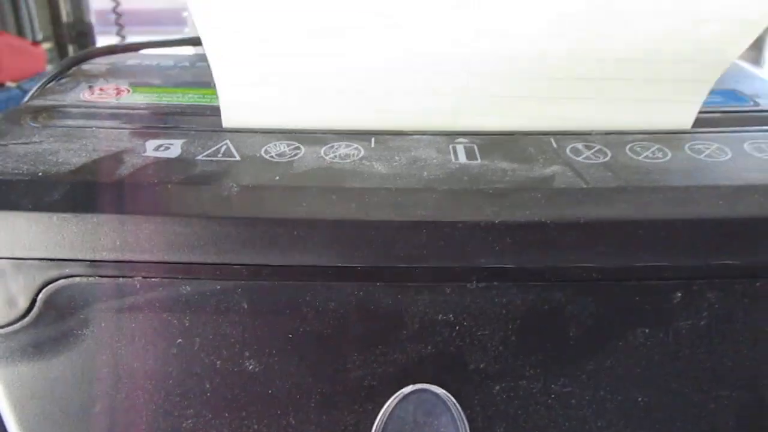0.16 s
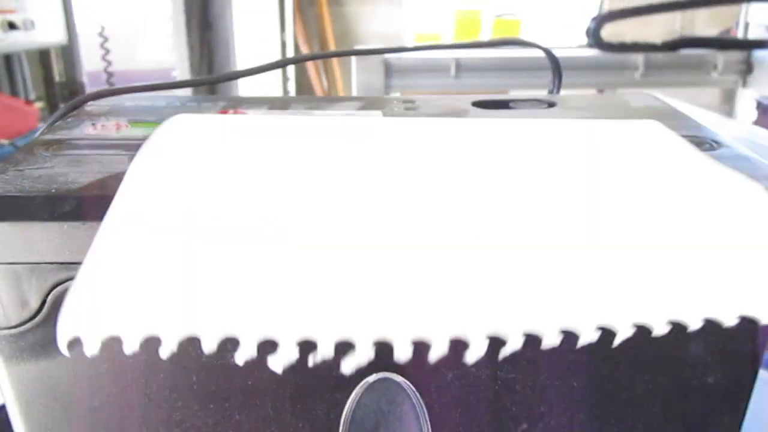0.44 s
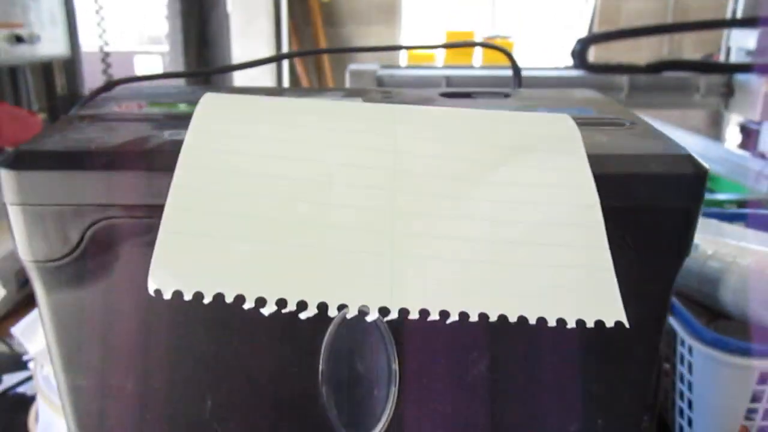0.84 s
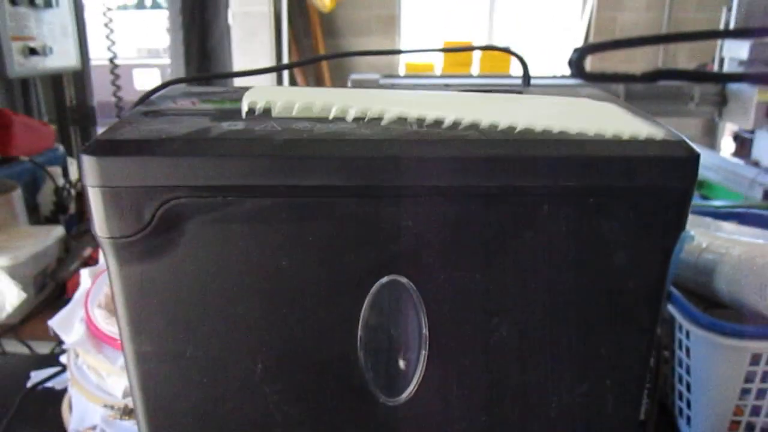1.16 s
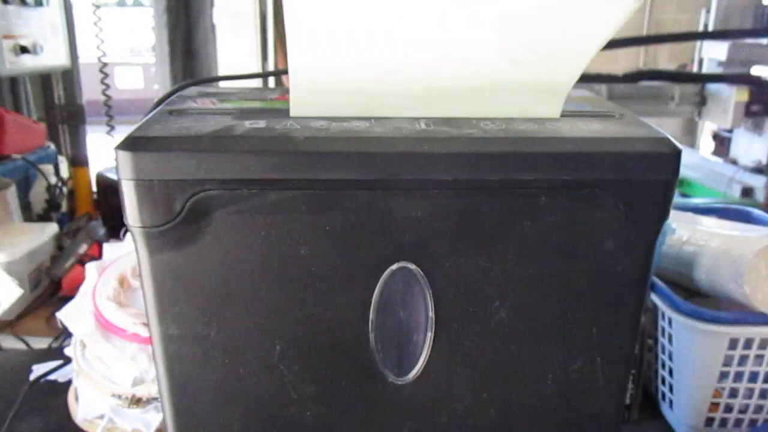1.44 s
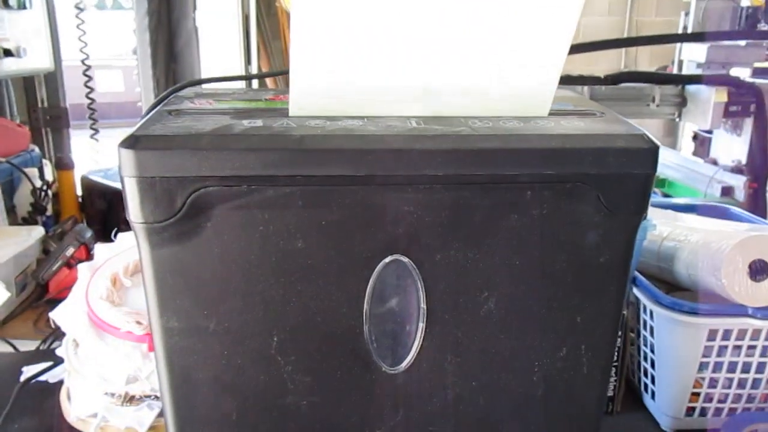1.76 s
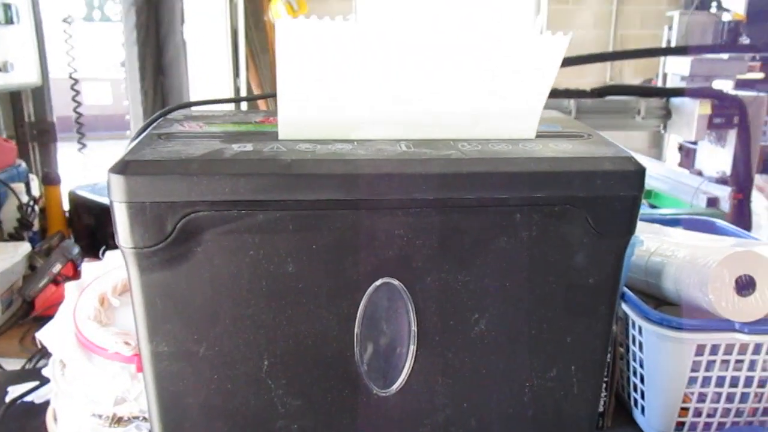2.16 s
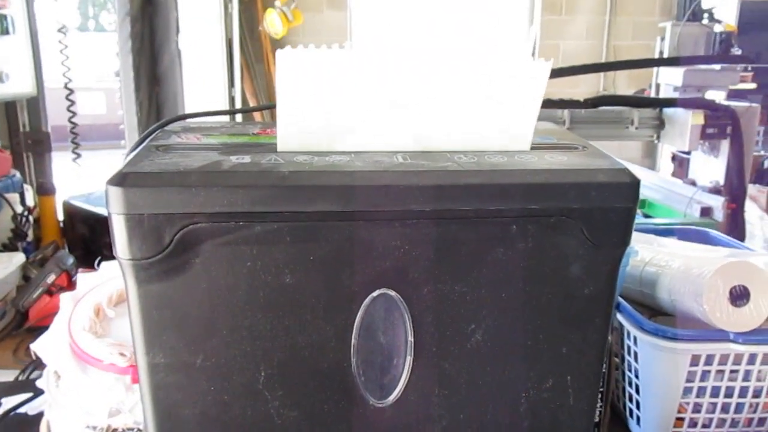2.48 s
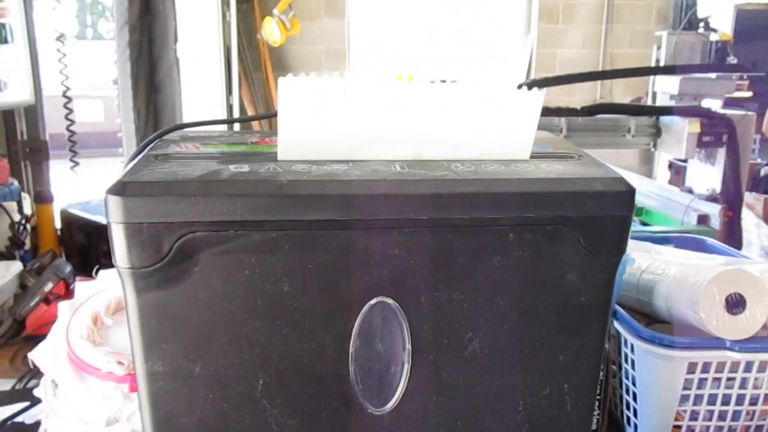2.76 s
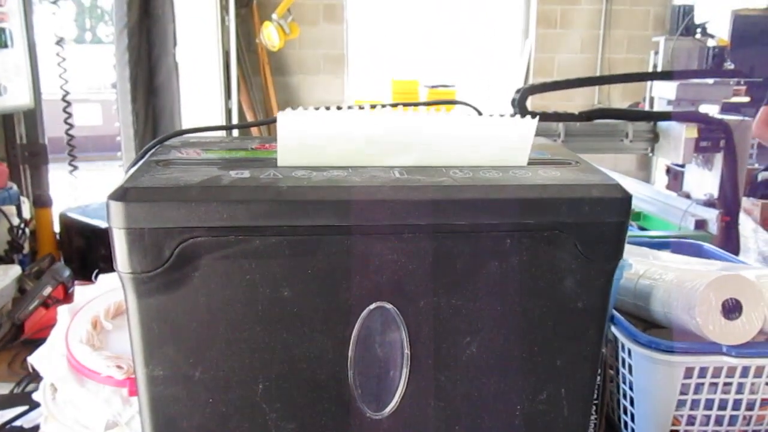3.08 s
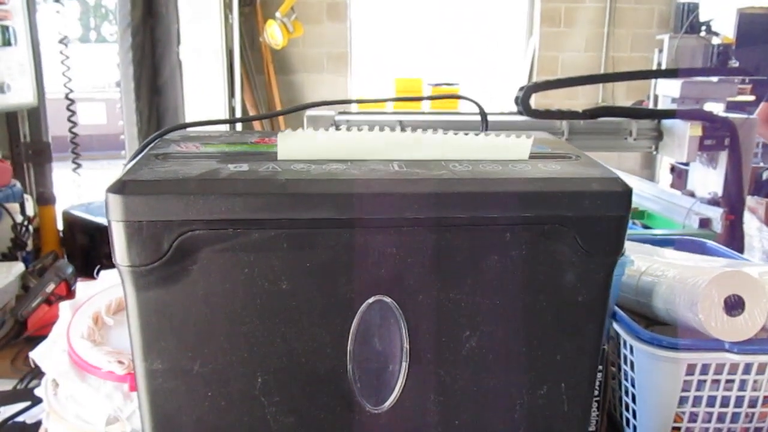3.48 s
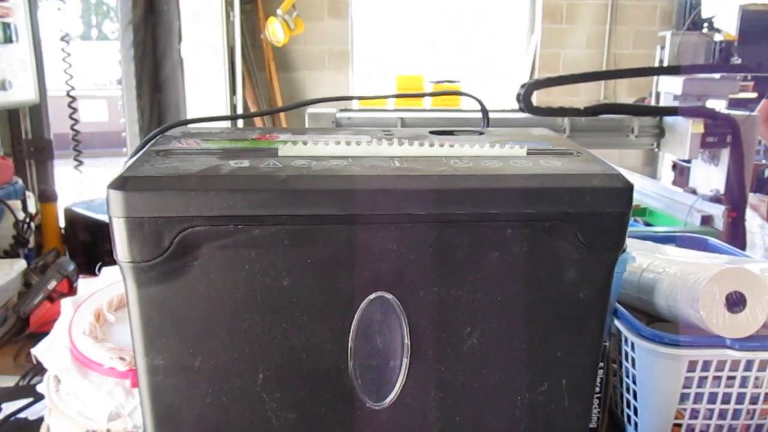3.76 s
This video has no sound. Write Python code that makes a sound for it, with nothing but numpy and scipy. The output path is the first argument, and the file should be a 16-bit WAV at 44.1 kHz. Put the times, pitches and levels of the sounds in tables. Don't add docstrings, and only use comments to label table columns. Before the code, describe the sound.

Close paper shredder whirring with gritty gear rattle as paper is pulled in, snapping and crackling

```python
import sys
import numpy as np
from scipy import signal
from scipy.fft import rfft, irfft, next_fast_len
from scipy.io import wavfile
from scipy.ndimage import uniform_filter1d, map_coordinates

SR = 44100
rng = np.random.default_rng(int(sys.argv[2]) if len(sys.argv) > 2 else 0)


def generate_wav(signal):
    frames = np.transpose(np.atleast_2d(signal))
    scaled = np.clip(frames, -1, 1) * 32767
    pcm = np.round(scaled).astype(np.int16)
    wavfile.write(sys.argv[1], SR, pcm)


def decibels_to_gain(level_db):
    exponent = np.asarray(level_db, float) / 20
    return 10 ** exponent


N = 172872

TEETH = 8
MAINS_HZ = 120

# t/s, grind/dB, whine/dB, bin boom/dB, crackle/dB
MICROPHONE = [(0, -29.5, -32, -4, 3), (.42, -28.5, -29, -5, 4), (.69, -27.5, -24.5, 0, -2),
              (1.0, -29, -28.5, -4.5, -3), (1.25, -29, -27, -0.5, 2), (1.55, -31, -31.5, -4, -2),
              (1.8, -30, -32, -2.5, -2), (2.3, -29, -27, 1, -1), (2.7, -27, -27, 4, -2),
              (2.95, -26.5, -26, 4, 2), (3.3, -26, -22, 5.5, -1), (3.6, -27, -22.5, 4.5, 1),
              (3.92, -25, -24, 5.5, 0)]
# f/Hz, level/dB
BRIGHT_TICK = [(6000, -19), (8500, 1), (12000, -4.5), (15500, -10)]
# f/Hz, level/dB
SHEET_BODY = [(500, -22), (1300, -8.5), (2500, -1), (3600, 0), (5000, -31)]


def unit(x):
    return x / np.sqrt(np.mean(x ** 2) + 1e-20)


def curves(rows):
    s, *cols = np.transpose(rows)
    return [np.interp(np.arange(N) / SR, s, c) for c in cols]


def wobble(rate):
    knots = rng.standard_normal(int(N * rate / SR) + 4)
    return map_coordinates(knots, [np.arange(N) * rate / SR])


def coloured(x, points, peaks=()):
    m = next_fast_len(N + 8192)
    hz = np.fft.rfftfreq(m, 1 / SR)
    f, db = np.transpose(points)
    lift_db = sum(g / (1 + (2 * (hz - c) / w) ** 2) for c, w, g in peaks)
    response_db = np.interp(np.log(hz + 1), np.log(f + 1), db) + lift_db
    return irfft(rfft(x, m) * decibels_to_gain(response_db), m)[:N]


def shaft_angle():
    # t/s, f/Hz
    mesh_speed = [(0, 3606), (.15, 3613), (.4, 3636), (.95, 3641), (1.2, 3619), (1.45, 3642), (1.7, 3641),
                  (1.95, 3635), (2.22, 3622), (2.5, 3634), (2.74, 3644), (3.0, 3640), (3.25, 3637),
                  (3.55, 3649), (3.92, 3668)]
    return 2 * np.pi * np.cumsum(curves(mesh_speed)[0] / TEETH) / SR


def line_drift(order, close_db):
    if order == TEETH:
        return 0.5 - 0.6 * close_db + 0.8 * wobble(8) + wobble(35)
    slow_db = 1.3 + (order < 2.5)
    return close_db * (order < 6) + slow_db * wobble(4) + 1.1 * wobble(25)


def motor():
    # shaft order, mains sideband, level with sheet bent/dB, level with sheet upright/dB
    shaft_lines = [(1, 0, -22, -15), (1, 1, -21, -20), (2, 0, -12, -13), (2, 1, -19, -18), (2, 2, -25, -20),
                   (3, 0, -6.5, -6), (3, -1, -20, -13), (3, 1, -8, -10.5), (3, 1 / 3, -12, -11),
                   (3, 2 / 3, -14, -12), (4, 0, -9, -19), (5, 0, -9, -13), (5, -1, -19, -16),
                   (6, 0, -18, -14.5), (6, -1, -14, -18), (7, 0, -16, -17), (7, -1, -24, -18), (8, 0, 2, 2),
                   (8, -1, -15, -14), (8, 1, -8.5, -9), (9, 0, -25, -17), (12, 0, -21, -28),
                   (13, 0, -25, -28), (15, 0, -25, -20)]
    # turns of the shaft, level with sheet bent/dB, level with sheet upright/dB
    gear_lines = [(0.367, -25, -23), (0.484, -42, -22), (1.586, -13, -11), (1.914, -21, -20),
                  (2.18, -15, -23), (2.469, -18, -19), (2.911, -19, -24), (6.445, -19, -17)]
    lag, twist = 0.63, 7
    t = np.arange(N) / SR
    shaft = shaft_angle() + 0.015 * wobble(30)
    upright_share = np.clip((t - 1.1) / 0.4, 0, 1)
    close_db = 7.5 * np.exp(-t / 0.18)

    def tone(order, phase, bent_db, upright_db):
        level_db = 3 + bent_db + (upright_db - bent_db) * upright_share
        return decibels_to_gain(level_db + line_drift(order, close_db)) * np.sin(phase)

    start = rng.uniform(0, 2 * np.pi, size=16)
    whine = np.zeros(N)
    for order, side, bent_db, upright_db in shaft_lines:
        pulse = side * (2 * np.pi * MAINS_HZ * t + lag * order) + twist * side ** 2
        whine += tone(order, order * shaft + start[order] + pulse, bent_db, upright_db)
    for order, bent_db, upright_db in gear_lines:
        whine += tone(order, order * shaft + 0.2 * wobble(12), bent_db, upright_db)

    _, whine_db, boom_db, _ = curves(MICROPHONE)
    throb = decibels_to_gain(-46 + 0.8 * boom_db + 1.9 * wobble(5.06)) * np.sin(0.154 * shaft)
    swell = decibels_to_gain(-37) * np.clip((t - 3.68) / 0.11, 0, 1) * np.sin(0.367 * shaft)
    return decibels_to_gain(whine_db) * whine + throb + swell


def grind():
    # f/Hz, level/dB per Hz
    hiss_colour = [(250, -33), (450, -14), (750, -5), (1900, -11), (3300, -4.5), (5000, -10), (9000, -18),
                   (14900, -33.5), (15300, -60)]
    # f/Hz, width/Hz, level/dB
    casing = [(684, 480, 3.5), (1444, 210, 9), (2600, 1140, 3.5), (6630, 430, 4), (9100, 500, 0)]
    # f/Hz, level/dB per Hz
    bin_colour = [(20, -21), (45, -12), (95, -12), (125, -1.5), (165, 0), (250, -1), (330, -1), (420, -8.5),
                  (600, -53)]
    level_db, _, boom_db, _ = curves(MICROPHONE)
    t = np.arange(N) / SR
    mains_shake = 1 + 0.1 * np.cos(2 * np.pi * MAINS_HZ * t)
    shaft_shake = 1 + 0.023 * np.cos(shaft_angle())
    shake = mains_shake * shaft_shake * decibels_to_gain(0.86 * wobble(9) + 1.07 * wobble(40))
    hiss = unit(coloured(shake * rng.standard_normal(N), hiss_colour, casing))
    boom = unit(coloured(decibels_to_gain(1.1 * wobble(14)) * rng.standard_normal(N), bin_colour))
    return decibels_to_gain(level_db + 3.5) * hiss + decibels_to_gain(boom_db - 40) * boom


def crack(times, db, colour, life_s):
    k = np.arange(-60, 340)
    shape = np.exp(-np.where(k < 0, -2.5 * k, k) / SR / life_s)
    at = np.clip(np.round(np.asarray(times) * SR).astype(int)[:, None] + k, 0, N)
    gate = np.bincount(at.ravel(), (decibels_to_gain(db)[:, None] * shape).ravel(), N + 1)[:N]
    noise = coloured(rng.standard_normal(N), colour)
    power = np.abs(uniform_filter1d(noise ** 2, size=80))
    return gate * unit(noise / np.sqrt(power + 1e-9))


def crackle():
    # f/Hz, level/dB
    fibre_colour = [(700, -45), (2500, -20.5), (5000, 3.5), (9000, -1), (14900, -10.5), (15500, -30)]
    effort_db = curves(MICROPHONE)[3]
    crowding = np.cumsum(decibels_to_gain(4.5 * wobble(35) + 1.5 * effort_db))
    draw = rng.random((3, 900, 2))
    times = np.interp(draw[..., 0] * crowding[-1], crowding, np.arange(N) / SR)
    size_db = -3.2 * np.log(draw[..., 1] + 0.11)
    fine = crack(times[0], size_db[0] - 28, fibre_colour, life_s=0.00025)
    fine += crack(times[1], size_db[1] - 60.0, BRIGHT_TICK, life_s=0.00017)
    fine += crack(times[2], 1.03 * size_db[2] - 30.5, SHEET_BODY, life_s=0.00083)
    return decibels_to_gain(0.18 * effort_db) * fine


def snaps():
    # t/s, snap/dB, bright tick/dB, low body/dB
    fold_snaps = [(0.01, -16, -28, -17), (0.0575, -13.5, -32, -11.5), (0.1312, -24, -38, -13.5),
                  (0.1859, -15, -31, -13.5), (0.2325, -26, -35, -14.5), (0.2405, -24, -28, -17),
                  (0.2693, -18, -29, -14), (0.28, -13.5, -30, -13), (0.3221, -16.5, -25, -13),
                  (0.3386, -16, -22, -24), (0.3522, -17, -20, -14), (0.3685, -12.5, -25, -27),
                  (0.4353, -20, -19, -38), (0.4511, -20, -14, -12.5), (0.4887, -17, -24, -13),
                  (0.5927, -12.5, -40, -14), (0.613, -22, -35, -11.5), (0.6724, -16, -21, -14.5),
                  (0.7049, -18, -33, -18), (0.7563, -16, -27, -18), (0.7965, -17, -32, -30),
                  (0.8395, -14, -22, -10.5), (1.1117, -16, -31, -16), (1.1926, -20, -29, -13)]
    # t/s, snap/dB, bright tick/dB, low body/dB
    tear_snaps = [(1.3417, -16, -18, -13.5), (1.3775, -11.5, -22, -16), (1.4705, -14, -29, -35),
                  (1.7788, -19, -25, -22), (1.8268, -16, -25, -27), (2.0938, -21, -19.5, -35),
                  (2.2167, -16, -20, -31), (2.2486, -19, -20, -32), (2.7519, -18.5, -30, -26),
                  (2.8454, -16, -19, -19), (2.8879, -19, -17, -26), (2.895, -20, -22, -27),
                  (2.9048, -11, -14, -31), (2.9302, -16, -21, -19), (3.0165, -26, -18, -31),
                  (3.2747, -26, -15.5, -27), (3.5534, -13.5, -14, -28), (3.5991, -16, -13, -27),
                  (3.8666, -27, -16, -18)]
    # f/Hz, level/dB
    snap_colour = [(2500, -24), (4000, 6.5), (6000, 0.5), (8000, -3.5), (11000, -32)]
    s, snap_db, tick_db, body_db = np.transpose(list(fold_snaps) + list(tear_snaps))
    out = crack(s, snap_db + 3.5, snap_colour, life_s=0.0007)
    out += crack(s, tick_db - 0.5, BRIGHT_TICK, life_s=0.0007)
    return out + crack(s, body_db + 0.55, SHEET_BODY, life_s=0.0014)


def slaps():
    # t/s, level/dB
    lid_slaps = [
        (0.01, -16.5),
        (0.838, -19),
        (1.194, -17.5),
        (1.236, -13),
    ]
    # f/Hz, level/dB
    lid_colour = [(300, -41), (600, -14), (800, -3.5), (1100, -22), (2200, -21), (6000, -45)]
    return crack(*np.transpose(lid_slaps), lid_colour, life_s=0.0035)


def bites():
    # t/s, snap/dB, bright tick/dB
    blade_bites = [(0.0804, -23, -36), (0.1373, -23, -37), (0.2274, -22, -35), (0.2767, -21, -29),
                   (0.3426, -21, -21), (0.3833, -28, -31), (0.4056, -28, -27), (0.4178, -28, -27),
                   (0.4554, -21, -26), (0.502, -23, -41), (0.5182, -21.5, -31), (0.6667, -28, -27),
                   (0.82, -21, -29), (0.8749, -30, -31), (0.8934, -29, -34), (0.9348, -23.5, -37),
                   (1.0271, -23.5, -33), (1.0498, -29, -34), (1.105, -25, -32), (1.1632, -24, -33),
                   (1.1692, -26, -34), (1.2324, -21, -36), (1.2367, -24, -27), (1.2657, -23, -26),
                   (1.3171, -21, -28), (1.387, -28, -26), (1.4262, -29, -29), (1.5085, -24, -34),
                   (1.5357, -25, -32), (1.563, -25, -38), (1.5823, -23, -35), (1.6013, -26, -31),
                   (1.61, -23, -33), (1.6691, -32, -34), (1.7117, -29, -37), (1.7155, -27, -34),
                   (1.834, -23, -34), (1.869, -25, -35), (1.8843, -31, -29), (1.9114, -23, -33),
                   (1.9557, -29, -36), (2.0102, -29, -29), (2.046, -33, -25), (2.0645, -28, -39),
                   (2.0754, -31, -28), (2.1803, -25, -28), (2.3111, -29, -28), (2.3319, -32, -31),
                   (2.5, -25, -28), (2.5046, -23, -29), (2.5377, -22, -21), (2.8047, -26, -28),
                   (2.984, -20.5, -21), (3.0249, -25, -29), (3.4644, -31, -20), (3.5176, -24, -18),
                   (3.6103, -23, -20), (3.859, -30, -20)]
    # f/Hz, level/dB
    crunch_colour = [(1500, -31), (3000, 3), (5000, 2), (8000, -8), (10000, -35)]
    s, snap_db, tick_db = np.transpose(blade_bites)
    crunch = crack(s, snap_db + 5.5, crunch_colour, life_s=0.0014)
    return crunch + crack(s, tick_db + 0.3, BRIGHT_TICK, life_s=0.00093)


def scene():
    dry = motor() + grind() + crackle() + snaps() + slaps() + bites()
    tail = rng.standard_normal(700) * np.exp(-np.arange(700) / SR / 0.004)
    room = np.pad(tail, (130, 0))
    reflections = signal.fftconvolve(dry, room / np.linalg.norm(room))[:N]
    return (dry + decibels_to_gain(-14.0) * reflections)[None]


def top_cut(x):
    return signal.sosfilt(signal.butter(12, 15720, fs=SR, output="sos"), x)


def record(dry):
    # from t/s, to t/s
    mute_spans = [
        (1.1172, 1.1462),
        (1.6782, 1.7066),
    ]
    # f/Hz, level/dB
    mute_colour = [(1500, -2), (2100, -18), (4000, -24), (6500, -16), (9500, -1), (12000, -3)]
    # f/Hz, level/dB
    band_limit = [(20, 0), (15020, 0), (15120, -44)]
    t = np.arange(N) / SR
    gate = sum(np.clip(np.minimum(t - a, b - t) / 0.0006, 0, 1) for a, b in mute_spans)
    muted = (1 - gate) * dry[0] + gate * coloured(dry[0], mute_colour)
    return top_cut(coloured(muted, band_limit)[None])


dry = scene()
out = record(dry)
generate_wav(out)
```